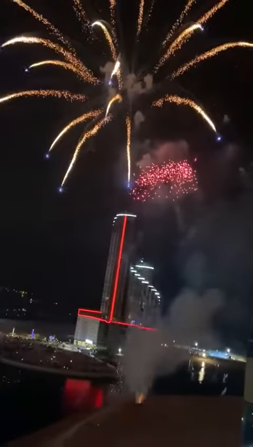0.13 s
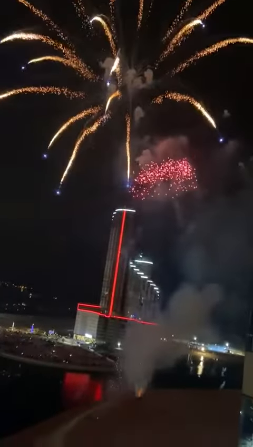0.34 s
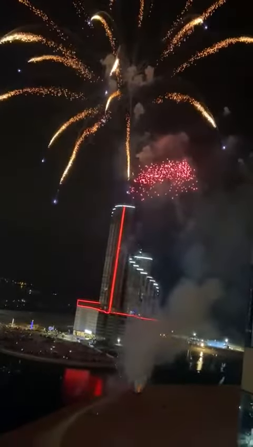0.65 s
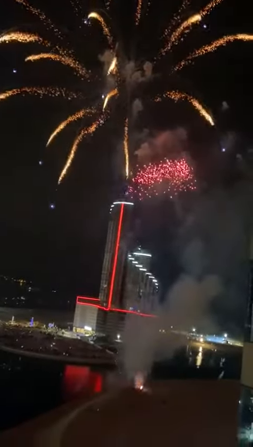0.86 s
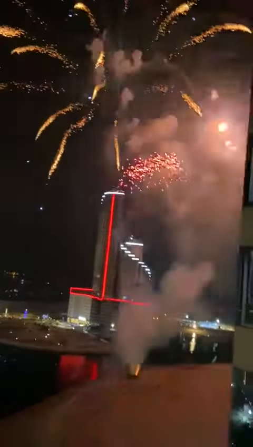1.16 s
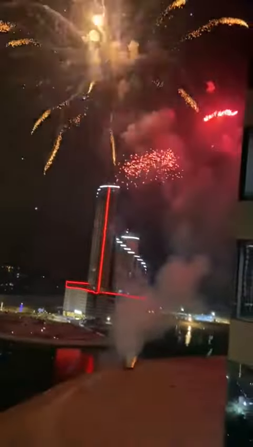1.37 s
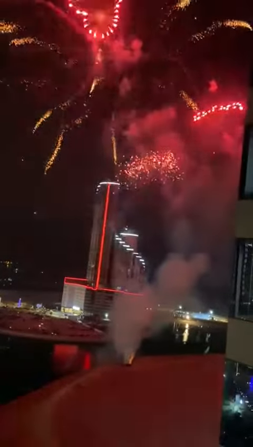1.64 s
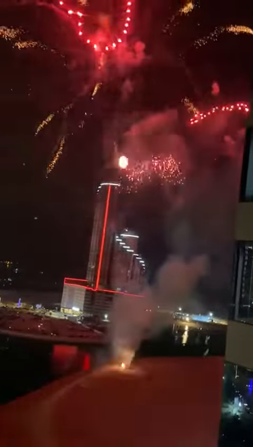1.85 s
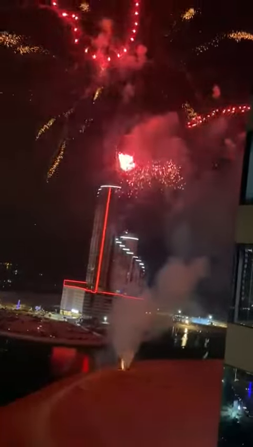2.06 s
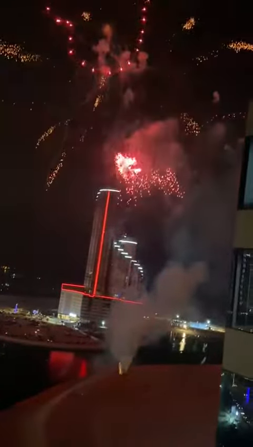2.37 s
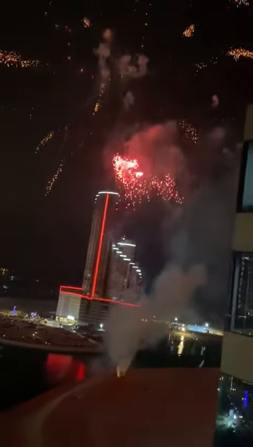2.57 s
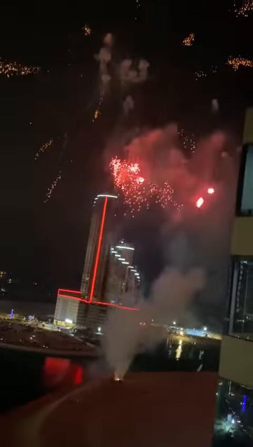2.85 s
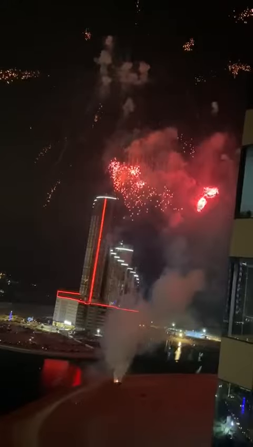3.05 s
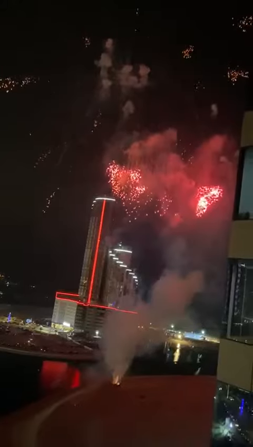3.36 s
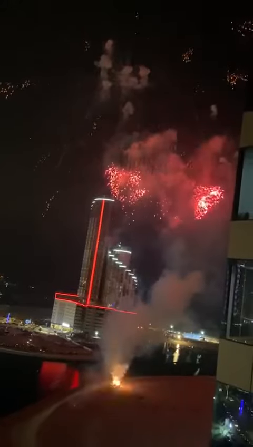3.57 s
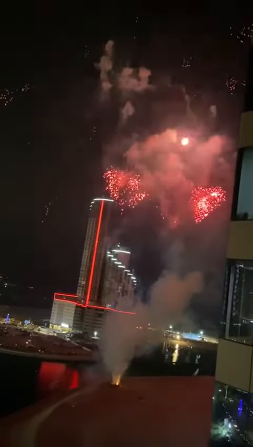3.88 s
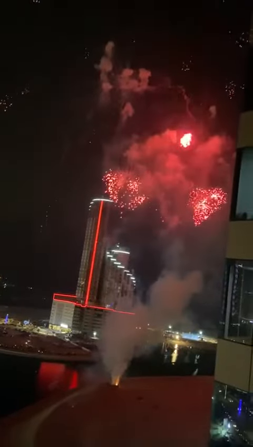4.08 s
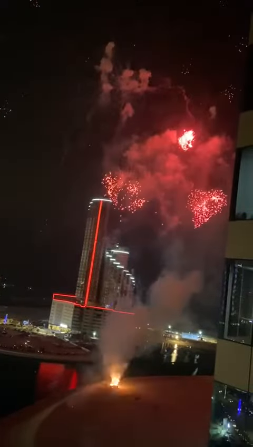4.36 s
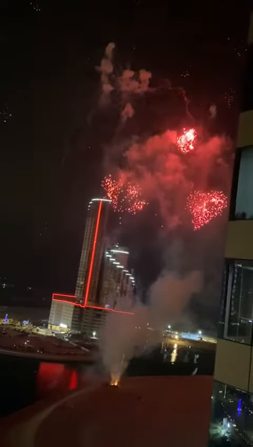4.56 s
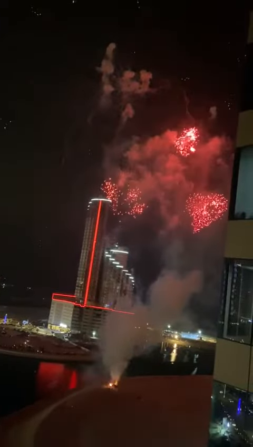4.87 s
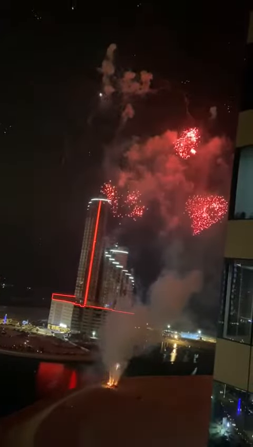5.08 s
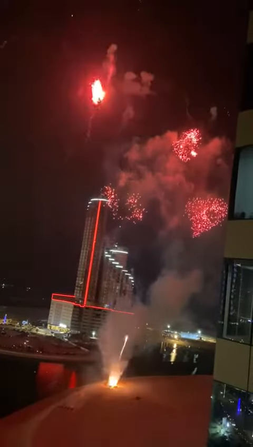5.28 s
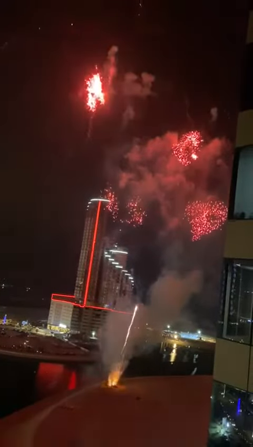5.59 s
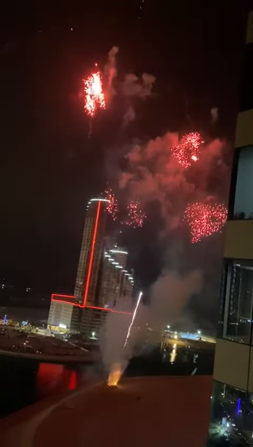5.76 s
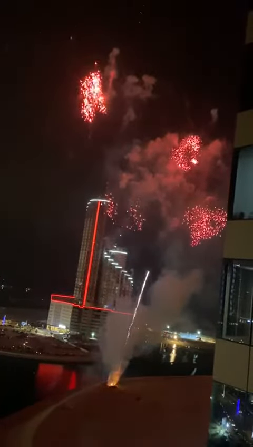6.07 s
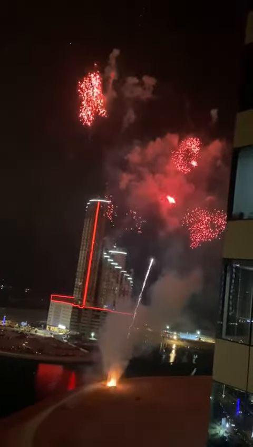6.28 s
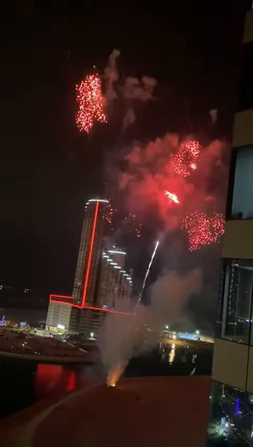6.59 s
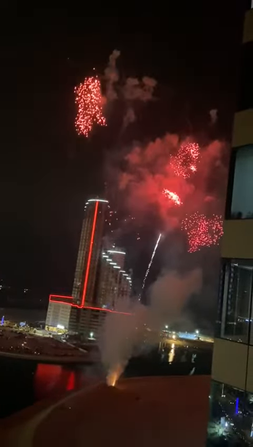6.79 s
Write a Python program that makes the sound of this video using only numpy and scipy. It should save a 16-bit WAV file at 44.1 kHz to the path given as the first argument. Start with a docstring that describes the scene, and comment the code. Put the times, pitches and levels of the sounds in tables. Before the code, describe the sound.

Fireworks bark upward from close by and crack sharply overhead, echoing off buildings over a low rolling rumble beside open water at night.

```python
"""Open waterfront at night, small stereo microphone, over a rolling rumble of far echoes: shaped bands of noise.
First faint star crackles and a faint bang overhead, then barking mortar thumps close by and dull booms.
Past 2 s sharp bangs crack overhead, some with a dense sizzle of random clicks; scattered bangs and echoes follow,
thickest at 5.7-6.5 s, then a last faint thump. Each bang is a click with noise debris, coloured by band; it comes
back from ground, near wall and facade and dies in scattered noise. The microphone delays lows and rounds peaks."""
import sys
import numpy as np
from scipy import signal
from scipy.fft import rfft, irfft, next_fast_len
from scipy.io import wavfile

SR = 44100
rng = np.random.default_rng(int(sys.argv[2]) if len(sys.argv) > 2 else 0)


def dump(signal):
    """Clip the signal to [-1, 1] and save it as 16-bit WAV at the path in sys.argv[1]."""
    limited = np.clip(np.atleast_2d(signal).T, -1, 1)
    pcm = np.round(limited * 32767).astype(np.int16)
    wavfile.write(sys.argv[1], SR, pcm)


N = 305605   # samples

# Centres of thump, boom, body, crack, snap, fizz: [f/Hz]
BAND_HZ = [55, 115, 280, 1100, 3900, 9000]
# Colour inside those bands: [f/Hz, level/dB per Hz]
BANG_TILT = [(12, -19), (20, -2), (81, 17.5), (326, 12), (588, -8), (978, -17.5), (1100, -19), (1250, -19),
             (1450, -18), (1770, -23), (2250, -20.5), (2860, -28), (5300, -28), (6400, -34), (7120, -54),
             (8500, -37.5), (9300, -34.5), (10700, -35), (12200, -34), (15800, -79.5), (22000, -120)]
# Fainter bangs are farther, so they lose more: [loss/dB for each dB below NEAR_DB], one per band
FAINT_LOSS = [0.29, 0.084, 0.18, 0.26, 0.11, 0.15]
# Each kind of bang: [colour/dB], [share of weight], [share of brightness], one per band; then scattered tail/dB
THUMP_KIND = [-9, -6, -3, -0.5, -5.5, -18], [1.24, 0.54, 0.37, 0, 0.31, 0.069], [0.5, 1.7, 1.5, 0, 1.4,
              5.5], -29
SHARP_KIND = [-25.5, -20.5, -1.5, -8.5, -12, -27], [0.92, 0.66, 0.029, 0.57, 0.26, 0.053], [0.41, 0.2, 0.13,
              1.42, 2.12, 3.34], -32
BOOM_KIND = [-14.5, -5.5, -16, -12.5, -42, -58], [1.2, 0.051, 0.19, 0.14, 0, 0], [0.1, 0.13, 0.57, 0.13,
             1.2, 1.3], -21
CRACKLE_KIND = [-37, -37, -27, -1, 5.5, -28], [0, 0, 1, 1, 0, 0], [0, 0, 0, 0, 0, 1], -43
# Thumping, barking bangs close by, with some of their echoes and the ragged crackle near 6.3 s:
# [t/s, level/dB, weight of the lows/dB, brightness/dB, facade echo/dB]
THUMPS = [(0.481, -10.5, 5, -1.5, -19), (0.727, -9, 0, -0.5, -15.5), (1.097, -27, 14.5, -9, -14),
          (1.729, -6.5, 1.5, 1, -15.5), (2.119, -7, 5.5, 2, -25), (2.2, -10.5, 8.5, 2, -19),
          (2.559, -10, -0.5, 3, -44), (2.676, -17.5, -7, -0.5, -22), (2.688, -4.5, -0.5, 0, -9.5),
          (3.966, -13, 7.5, -0.5, -9), (4.276, -27.5, 6, -7, -13), (4.336, -31, 11, -2, 0),
          (4.397, -5, 3, -1.5, -14), (5.118, -28.5, 1, -3.5, -13), (5.166, -29.5, -6, -2, -6),
          (5.204, -14, 9, -2, -11.5), (5.588, -24, -3, -7.5, -4), (5.725, -9, -12, 1.5, -7),
          (5.835, -24, 12, -13, -17), (6.1175, -8.5, 5, 0, -14), (6.181, -27, 23, 2, -20),
          (6.2115, -5.5, 1, 0, -9.5), (6.247, -9.5, 6, -2.5, -11), (6.261, -6.5, 0, -5, -12),
          (6.268, -15, -3, 1, -26), (6.281, -26, -15, -10, -4), (6.311, -26, 18, 1.5, -26),
          (6.325, -22.5, 6, 0.5, -24), (6.341, -21, 8, -1, -15), (6.883, -23, -1.5, -4, -8)]
# Sharp bangs overhead, and echoes of bangs from buildings:
# [t/s, level/dB, weight of the lows/dB, brightness/dB, facade echo/dB]
SHARP_BANGS = [(0.323, -22, 0, -3, -18), (2.15, -18, -15, 7.5, -33), (2.174, -5, 8, -11, -19),
               (2.378, 0, -12, 3, -15), (2.388, -12, -2, 8.5, -27), (2.424, -6, 6, -2.5, -28),
               (2.496, -0.5, -5.5, 3.5, -32), (3.295, -31, -1, -13, 10.5), (3.648, -10.5, 9, -0.5, -22),
               (3.666, -18, 1, -0.5, -10), (3.68, -14, 15, 2.5, -13), (3.79, -14.5, 5, -3.5, -16),
               (3.836, -10.5, -7, 2.5, -13), (4.753, -2.5, -2, 1.5, -14.5), (4.908, -16.5, 21, -19, -14),
               (4.944, -9, 3, -1, -30), (4.964, -9, 2, -18, -12), (4.998, -9.5, -4, -7, -16),
               (5.679, 2, -12.5, 3, -15), (5.737, -12.5, 33, -9, -32), (5.770, -9, 20, -6.5, -8.5),
               (5.92, -0.5, -9, 0, -29), (5.966, -8, 5, -2, -37), (6.03, -21.5, 11, -0.5, -16),
               (6.160, -8.5, 9.5, 2.5, -8.5), (6.240, -9.5, 25, -4, -13), (6.273, -6.5, 11, -2.5, -9),
               (6.301, -24, 12, 3, -15), (6.508, -9.5, 17, 2, -9)]
# Dull booms, some farther off, one an echo of a nearer bang:
# [t/s, level/dB, weight of the lows/dB, brightness/dB, facade echo/dB]
BOOMS = [(1.15, -22.5, 6, 9, -24), (1.4, -20, 3.5, -9, -3), (1.529, -21.5, -5, -6, -20),
         (2.372, -4.5, -23, 22, -23), (2.423, -8, -32, 8, -4), (3.45, -17, -10, 10, -9),
         (5.552, -24.5, 6.5, 20, -15), (5.622, -36, 6, 7, -13)]
# Small crackles of falling stars: [t/s, level/dB, weight of the lows/dB, brightness/dB, facade echo/dB]
CRACKLES = [(.121, -36, 7, 11, -15), (.287, -43, -2, 5, -24), (.418, -42, 7, 1, -23),
            (.46, -34.5, 17, -1, -15), (1.573, -47, 8, 8, -20), (1.652, -46, -10, 0, -22),
            (1.692, -44, 2, -7, -20), (2.472, -28, 3, -4, -20), (6.008, -35, -4, -4, -20),
            (6.045, -34, 0, -3, -22)]
# Stars catching fire: [t/s, length/s, level/dB]
SIZZLES = [(2.119, .07, -26), (2.381, .09, -32.5), (2.494, .09, -37), (5.682, .07, -32),
           (5.764, 0.045, -32), (5.936, .14, -40.5), (6.148, 0.045, -33.5), (6.227, 0.057, -22.5),
           (6.287, 0.073, -35.5), (6.523, 0.098, -35.5)]
# Colour of the sizzle: [f/Hz, level/dB per Hz]
SIZZLE_COLOUR = [(250, -12), (600, 8.5), (1200, 3), (2300, -2.5), (4000, -12), (6000, -9), (7200, -45.5),
                 (9500, -32.5), (12000, -37)]
# Scattered tail of a bang: [f/Hz, time to fall 60 dB/s, level/dB]
TAIL_T60 = [(60, 0.54, -1.5), (287, 0.39, -5), (1520, 0.19, -1.5), (5930, 0.28, -6), (6860, 0.25, -9.5),
            (8300, .25, -11.5), (9000, 0.22, -3)]
# Rumble of far echoes: [t/s, low roll level/dB, wash level/dB, upper fizz level/dB]
ROLL = [(0.0, -17, -35.5, -43), (0.151, -26.5, -45, -52.5), (0.56, -26, -39, -55), (0.9, -28.5, -43, -58),
        (1.2, -32.5, -49, -61.5), (1.6, -33.5, -43.5, -61), (1.9, -36, -48, -63.5), (2.3, -26, -50, -59),
        (2.49, -29, -40, -45), (2.647, -25, -37.5, -45), (3.129, -22.5, -37.5, -51),
        (3.4, -25.5, -38.5, -54.5), (3.671, -24, -40, -54), (4.211, -30.5, -44, -58.5),
        (4.9, -31, -43.5, -55.5), (5.4, -26.5, -40, -57), (5.7, -31, -39.5, -56.5),
        (6.0, -30.5, -41, -45.5), (6.45, -30.5, -45, -56), (6.64, -22.5, -36, -48), (6.93, -28, -43, -55.5)]
# Colour of the rumble: [f/Hz, level/dB per Hz]
RUMBLE_COLOUR = [(22, -11.5), (45, -11.5), (81, 3), (160, -5), (229, -9), (300, -7.5), (420, -18.5),
                 (544, -20), (787, -18.5), (1490, -26), (2220, -28), (3300, -35.5), (5000, -44.5),
                 (6300, -43), (9500, -57.5)]
# Stereo width of direct sound: [f/Hz, side minus mid/dB]
SIDE_DB = [(60, -45.5), (130, -42), (200, -27), (350, -21.5), (630, -3), (850, -10), (1300, -11.5),
           (2000, -15), (2900, -1.5), (4000, -6.5), (5300, -6), (6300, 9), (7200, 24.5), (8300, 4),
           (9300, -6.5), (10200, -17.5), (11700, -3.5)]
# Stereo width of scattered sound: [f/Hz, side minus mid/dB]
FAR_SIDE_DB = [(60, -46.5), (200, -46), (350, -14.5), (630, 0.5), (1200, -6), (2000, -17), (2800, 0),
               (4200, -6), (5300, -10.5), (6200, 2.5), (7200, 31), (8400, 18), (9300, -7.5), (10200, -24.5)]
# Stereo width of the rumble: [f/Hz, side minus mid/dB]
ROLL_SIDE_DB = [(60, -51), (200, -54.5), (350, -17), (630, -5), (1200, -11), (1920, -22.5), (2900, -1.5),
                (4400, -14.5), (5440, -23), (6700, -7), (8250, -2.5)]
# Lean of the stereo microphone: [f/Hz, left minus right/dB]
LEAN_DB = [(300, 0), (500, -5), (700, -5), (1100, -1), (2000, -.2), (11000, -.5)]
# Part of the direct side signal unrelated to the mid: [f/Hz, share 0-1]
LOOSE = [(300, .7), (600, 0.23), (1200, 0.41), (2500, 0.36), (6000, .6), (11000, .3)]

# Reflections and bark of the thumps, and of all other bangs; the thumps scatter thin
THUMP_PLACE = dict(ground_db=-16, wall_db=-18.5, facade_wall_db=-19.5, punch_db=-5, tail_low_hz=403)
OTHER_PLACE = dict(ground_db=-16.5, wall_db=-18, facade_wall_db=-28, punch_db=-16, tail_low_hz=60)

# Microphone: lows lag by about this many of their own cycles, falling off towards the upper frequency
LATE_TURNS, LATE_FROM_HZ, LATE_UNDER_HZ = 2.1, 45, 1400
PEAK_TOP, CUTOFF_HZ = 1.05, 12900

# Front of a bang: ragged debris, more of it in fainter bangs (dB gained for each dB below NEAR_DB)
NEAR_DB = -6
DEBRIS_S, DEBRIS_DB, DEBRIS_CUT_HZ = .003, -14, 14000
BANG_BLUR, CRACKLE_BLUR = .3, .1
RISE_S, RISE_LOW_HZ, RISE_CUT_HZ = .0035, 900, 3300   # hiss swelling into each bang
RING_HZ, RING_WIDTH_HZ, RING_DB = 59.5, 21, 28        # ring within the lowest band
PUNCH_HZ, PUNCH_WIDTH_HZ = 1230, 460                  # brief bark in the middle

# Reflections, nearest first
GROUND_S = .000862
LEDGE_S, LEDGE_SPREAD, LEDGE_DB, LEDGE_LOW_HZ = .0024, .27, -6, 900   # delay differs from bang to bang
WALL_S, WALL_LOW_HZ, WALL_AGAIN_DB = .0262, 2500, -15.5   # small wall: short waves, then once more
FACADE_S, FACADE_CUT_HZ, FACADE_LOW_HZ = .0636, 3000, 153
FACADE_ROUGH_S, FACADE_ROUGH_DB = .004, -21
BAYS_HZ, BAYS_WIDTH_HZ, BAYS_DB = 1000, 820, 4.5          # bays of the facade favour the middle
THIN_SLAP_LOW_HZ, DULL_SLAP_CUT_HZ = 410, 510
# Facade echo returned once more by the near wall, short waves only
FACADE_WALL_S, FACADE_WALL_LOW_HZ = .0898, 3500
TAIL_RISE_S, TAIL_LUMP_S, TAIL_LUMPS_DB = .006, .0012, 4.0   # separate walls make the tail lumpy
TAIL_VARIES_DB = 3.0                                      # each bang lights other walls

# Above these the fizz of the rumble loses first its mid, then its side
ROLL_MID_TOP_HZ, ROLL_SIDE_TOP_HZ = 6650, 9600
SIZZLE_PER_S, SIZZLE_SPREAD_DB, SIZZLE_EDGE_S = 1400, 3, .008


def from_db(db):
    """Decibels to gain."""
    return 10 ** (np.asarray(db) / 20)


def rms_one(x):
    """Scale to rms 1."""
    return x / np.sqrt(np.mean(x ** 2) + 1e-20)


def at_hz(points, hz):
    """Read a (f/Hz, value) table on a log axis."""
    points = np.array(points)
    return np.interp(np.log(hz), np.log(points[:, 0]), points[:, 1])


def bins(size):
    """Frequencies of a real spectrum in Hz, kept off zero."""
    return np.maximum(np.arange(size // 2 + 1) * SR / size, 1)


def delay(hz, s):
    """Spectrum of a pure delay."""
    return np.exp(-2j * np.pi * hz * s)


def low_cut(hz, corner_hz):
    """First-order loss of long waves."""
    return 1 / (1 - 1j * corner_hz / hz)


def high_cut(hz, corner_hz):
    """First-order loss of short waves."""
    return 1 / (1 + 1j * hz / corner_hz)


def resonance(hz, centre_hz, width_hz):
    """A single mode: peaks at 1 and rings on for longer when narrow."""
    return 1 / (1 + 2j * (hz - centre_hz) / width_hz)


def drift(rate_hz):
    """Slow random wander with spread 1, computed at every 40th sample."""
    r = np.exp(-80 * np.pi * rate_hz / SR)
    noise = rng.standard_normal(N // 40 + 2002)
    slow = signal.lfilter([1], [1, -2 * r, r * r], noise)[2000:]   # skip the settling
    return np.interp(np.arange(N) / 40, np.arange(len(slow)), rms_one(slow))


def left_right(mid, side, hz):
    """Two microphone channels from mid and side, with the lean between them."""
    lean = from_db(at_hz(LEAN_DB, hz) / 2)
    return np.array([(mid + side) * lean, (mid - side) / lean])


def late_lows(hz):
    """Phase of the microphone: group delay = turns * (1 / (f + from) - 1 / (f + under))."""
    return np.exp(-2j * np.pi * LATE_TURNS * np.log((hz + LATE_FROM_HZ) / (hz + LATE_UNDER_HZ)))


def rumble(patchy_db, high_patchy_db, lumps_db):
    """Far echoes as narrow bands of noise: the lows swell together, each band also flickers."""
    t, *levels_db = np.transpose(ROLL)
    roll_db, wash_db, fizz_db = (np.interp(np.arange(N) / SR, t, level) for level in levels_db)
    parts = [0, 0, 0]   # roll, wash, fizz
    together = drift(9)
    edges = 22 * 2 ** np.arange(0, 9.1, .3)
    white = rng.standard_normal((2, 2, N))   # neighbouring bands get unrelated noise
    for k, (low, high) in enumerate(zip(edges, edges[1:])):
        band = signal.butter(2, [low, high], "band", fs=SR, output="sos")
        mid, side = signal.sosfilt(band, white[k % 2])
        hz = np.sqrt(low * high)
        flicker_db = (patchy_db if hz < 500 else high_patchy_db) * drift(9.7)
        swell_db = lumps_db * together * (hz < 500)
        gain = from_db(at_hz(RUMBLE_COLOUR, hz) + swell_db + flicker_db)
        part = int(hz > 500) + int(hz > 2200)
        side = side * from_db(at_hz(ROLL_SIDE_DB, hz))
        parts[part] = parts[part] + gain * left_right(mid, side, hz)
    roll, wash, (left, right) = parts
    mid_top, side_top = (signal.cheby2(12, 60, top_hz, fs=SR, output="sos")
                         for top_hz in (ROLL_MID_TOP_HZ, ROLL_SIDE_TOP_HZ))
    mid, side = signal.sosfilt(mid_top, left + right), signal.sosfilt(side_top, left - right)
    fizz = np.array([mid + side, mid - side])
    return from_db(roll_db) * rms_one(roll) + from_db(wash_db) * rms_one(wash) + from_db(fizz_db) * rms_one(fizz)


def sizzle():
    """Igniting stars: dense uneven clicks, each from its own direction."""
    size, t = next_fast_len(N), np.arange(N) / SR
    hz = bins(size)
    sizes = from_db(SIZZLE_SPREAD_DB * np.minimum(rng.exponential(1, N), 4)) * rng.choice([-1, 1], N)
    happens = rng.random(N) < SIZZLE_PER_S / SR
    direction = np.array([np.ones(N), rng.uniform(-1.7, 1.7, N)])   # mid, side
    cracks = sizes * happens * direction
    gain = np.zeros(N)
    for start, length, level_db in SIZZLES:
        to_edge = np.minimum(t - start, start + length - t)
        gain += from_db(level_db) * np.clip(to_edge / SIZZLE_EDGE_S, 0, 1)
    colour = from_db(at_hz(SIZZLE_COLOUR, hz)) * late_lows(hz)
    scale = np.sqrt(np.mean(irfft(rfft(cracks[0], size) * colour, size) ** 2))
    mid, side = rfft(cracks * gain, size) * colour / scale
    return irfft(left_right(mid, side * from_db(at_hz(SIDE_DB, hz)), hz), size)[:, :N]


def rising_hiss(level_db, t, hz):
    """Spectrum of noise that swells up to the moment of the bang; mid and side."""
    hiss = rng.standard_normal((2, len(t))) * np.exp(-t / RISE_S)
    backwards = np.conj(rfft(hiss))   # turns the decay into a swell
    return from_db(level_db) * backwards / (1 + (RISE_LOW_HZ / hz) ** 2) / (1 + (hz / RISE_CUT_HZ) ** 2)


def ragged(level_db, spread_s, t, hz):
    """A click followed by small-scale scatter, weaker in the lows and the top; mid and side."""
    scatter = rng.standard_normal((2, len(t))) * np.exp(-t / spread_s) * np.tanh(t / 0.0026)
    colour = hz / (hz + 400) / (1 + (hz / DEBRIS_CUT_HZ) ** 2)
    return np.array([[1], [0]]) + from_db(level_db) * colour * rfft(scatter)


def dying_shapes(t, hz):
    """For each band of the tail: its share of the spectrum and its decay in time."""
    centres = np.log(np.array(TAIL_T60)[:, 0])
    shapes = []
    for k, (_, t60, level_db) in enumerate(TAIL_T60):
        share = np.interp(np.log(hz), centres, np.arange(len(TAIL_T60)) == k)
        decay = from_db(level_db - 60 * t / t60) * (1 - np.exp(-t / TAIL_RISE_S))
        shapes.append((share, decay))
    return shapes


def dying_noise(shapes, t):
    """Scattered tail: lumpy mid and side noise, each band dying at its own pace."""
    lumps = np.interp(t / TAIL_LUMP_S, np.arange(400), rng.standard_normal(400))
    white = rng.standard_normal((2, len(t))) * from_db(TAIL_LUMPS_DB * lumps)
    return sum(from_db(TAIL_VARIES_DB * rng.standard_normal()) * share * rfft(white * decay)
               for share, decay in shapes)


def bang_bands(hz):
    """Spectra of thump to fizz through the microphone, each peaking at 1 in time; the lowest rings."""
    shares = [np.interp(np.log(hz), np.log(BAND_HZ), row) for row in np.eye(len(BAND_HZ))]
    bands = [from_db(at_hz(BANG_TILT, hz)) * late_lows(hz) * share for share in shares]
    bands[0] = bands[0] * (1 + from_db(RING_DB) * resonance(hz, RING_HZ, RING_WIDTH_HZ))
    return np.array([band / np.abs(irfft(band)).max() for band in bands])


def near_wall(hz):
    """A small wall returns only short waves, twice."""
    bounce = delay(hz, WALL_S)
    return bounce * (1 + from_db(WALL_AGAIN_DB) * bounce) * low_cut(hz, WALL_LOW_HZ)


def facade(hz):
    """A large facade returns the middle best."""
    echo = delay(hz, FACADE_S) * high_cut(hz, FACADE_CUT_HZ) * low_cut(hz, FACADE_LOW_HZ)
    return echo * (1 + from_db(BAYS_DB) * resonance(hz, BAYS_HZ, BAYS_WIDTH_HZ))


def ledge(hz):
    """A ledge close by adds a short echo, its delay drawn anew for each bang."""
    s = LEDGE_S * (1 + LEDGE_SPREAD * rng.uniform(-1.03, 1))
    return 1 + from_db(LEDGE_DB) * delay(hz, s) * hz / (hz + LEDGE_LOW_HZ)


def bangs(rows, kind, place, rise_db, thin_slap, blur, size=16384, lead=1024):
    """Shock fronts with debris, their reflections and scattered tail, coloured by band."""
    out, t, hz = np.zeros((2, N + size)), np.arange(size) / SR, bins(size)
    colour_db, lows, highs, tail_db = map(np.array, kind)
    bands, shapes = bang_bands(hz), dying_shapes(t, hz)
    bark = 1 + from_db(place["punch_db"]) * resonance(hz, PUNCH_HZ, PUNCH_WIDTH_HZ)
    ground = 1 + from_db(place["ground_db"]) * delay(hz, GROUND_S)
    facade_wall = delay(hz, FACADE_WALL_S) * low_cut(hz, FACADE_WALL_LOW_HZ) ** 2
    walls = 1 + from_db(place["wall_db"]) * near_wall(hz) + from_db(place["facade_wall_db"]) * facade_wall
    slap = low_cut(hz, THIN_SLAP_LOW_HZ) if thin_slap else high_cut(hz, DULL_SLAP_CUT_HZ)
    slap = slap * facade(hz)
    loose, direct_side = np.clip(at_hz(LOOSE, hz), 0, 1), from_db(at_hz(SIDE_DB, hz))
    far_width = np.array([np.ones(len(hz)), from_db(at_hz(FAR_SIDE_DB, hz))])
    scattered = from_db(tail_db) * far_width * low_cut(hz, place["tail_low_hz"])
    for s, level_db, weight_db, bright_db, echo_db in rows:
        under_db = min(level_db - NEAR_DB, 0)
        band_db = level_db + under_db * np.array(FAINT_LOSS) + colour_db + weight_db * lows + bright_db * highs
        colour = from_db(band_db) @ bands
        front = ledge(hz) * ragged(DEBRIS_DB - blur * under_db, DEBRIS_S, t, hz) * bark
        rough = ragged(FACADE_ROUGH_DB, FACADE_ROUGH_S, t, hz) + rising_hiss(rise_db, t, hz)
        echo = from_db(echo_db) * slap * rough
        mid, other = (front + echo) * ground * walls + rising_hiss(rise_db, t, hz)
        # spaced ports: the related side is a quarter turn apart
        side = direct_side * (np.sqrt(1 - loose) * 1j * mid + np.sqrt(loose) * other)
        mid, side = [mid, side] + scattered * dying_noise(shapes, t)
        i = round(s * SR)
        # the lead leaves room for the hiss ahead of the bang
        out[:, i:i + size] += irfft(left_right(mid, side, hz) * colour * delay(hz, lead / SR))
    return out[:, lead:N + lead]


def crackles():
    """Falling stars: faint bangs, mostly crack and snap, with a thin facade echo."""
    return bangs(CRACKLES, CRACKLE_KIND, OTHER_PLACE, rise_db=-26, thin_slap=True, blur=CRACKLE_BLUR)


def booms():
    """Dull booms, some farther off, one an echo of a nearer bang; their facade echo is dull."""
    return bangs(BOOMS, BOOM_KIND, OTHER_PLACE, rise_db=-26, thin_slap=False, blur=BANG_BLUR)


def sharp_bangs():
    """Sharp bangs overhead, and echoes of bangs from buildings; their facade echo is dull."""
    return bangs(SHARP_BANGS, SHARP_KIND, OTHER_PLACE, rise_db=-23, thin_slap=False, blur=BANG_BLUR)


def thumps():
    """Thumping, barking bangs close by, some of their echoes and a ragged crackle; thin facade echo."""
    return bangs(THUMPS, THUMP_KIND, THUMP_PLACE, rise_db=-18, thin_slap=True, blur=BANG_BLUR)


def scene():
    """Far rumble, star sizzle and crackles, dull booms, sharp bangs and thumps."""
    far = rumble(patchy_db=3.0, high_patchy_db=1.1, lumps_db=2.0)
    return far + sizzle() + crackles() + booms() + sharp_bangs() + thumps()


def record(dry):
    """The microphone rounds the peaks and cuts the top."""
    rounded = PEAK_TOP * np.tanh(dry / PEAK_TOP)
    return signal.sosfilt(signal.cheby2(12, 70, CUTOFF_HZ, fs=SR, output="sos"), rounded)


dry = scene()
out = record(dry)
dump(out)
```